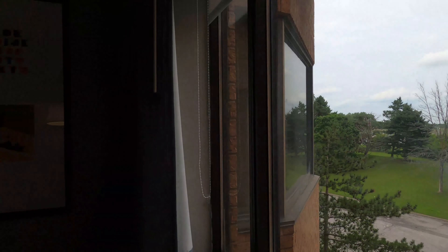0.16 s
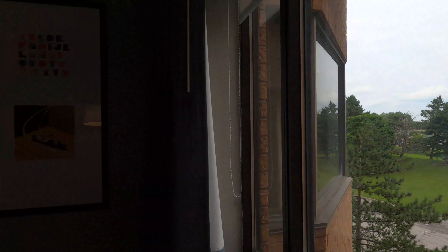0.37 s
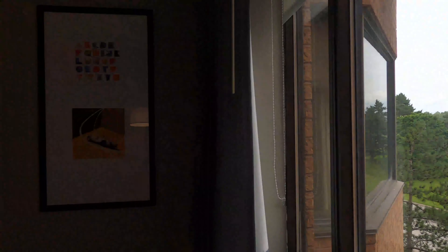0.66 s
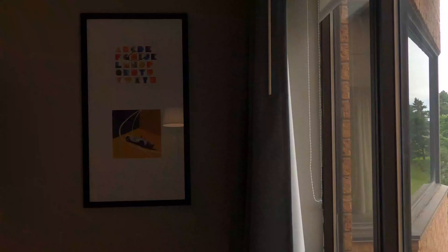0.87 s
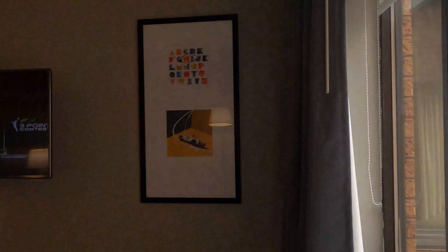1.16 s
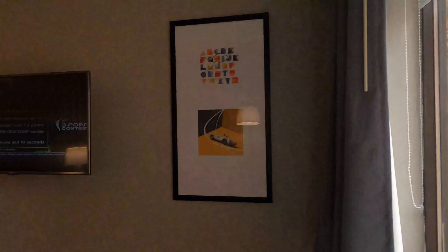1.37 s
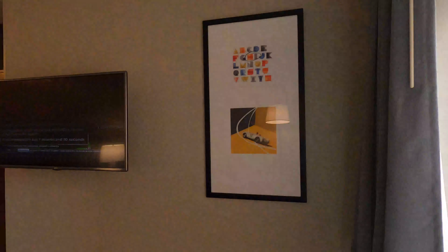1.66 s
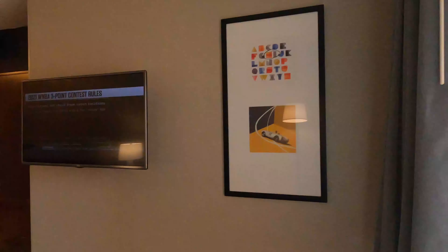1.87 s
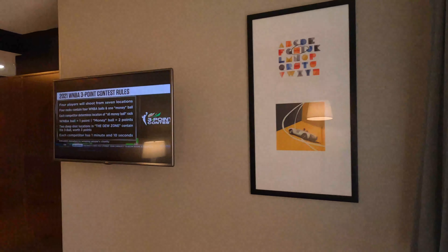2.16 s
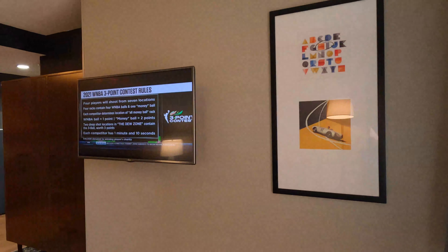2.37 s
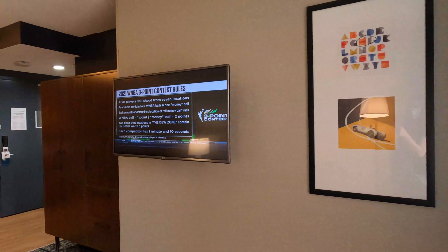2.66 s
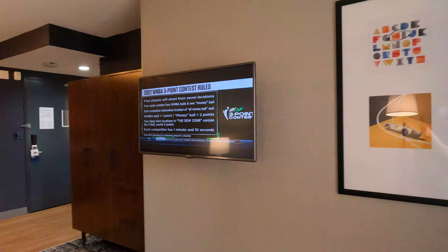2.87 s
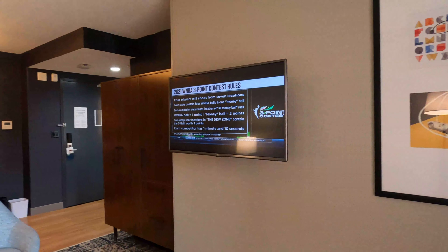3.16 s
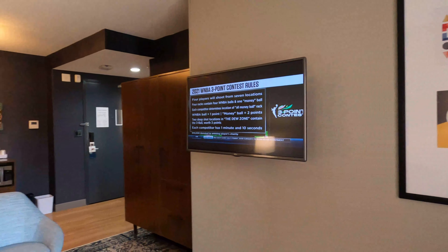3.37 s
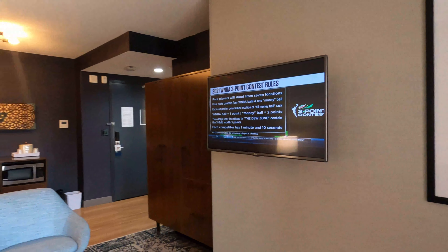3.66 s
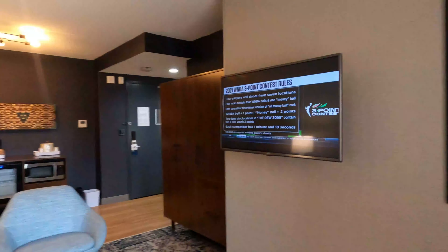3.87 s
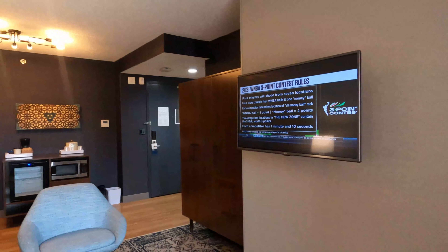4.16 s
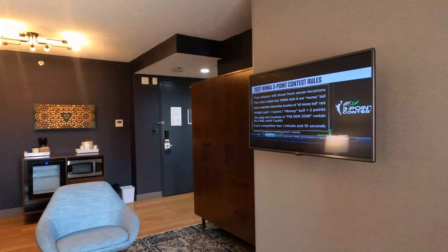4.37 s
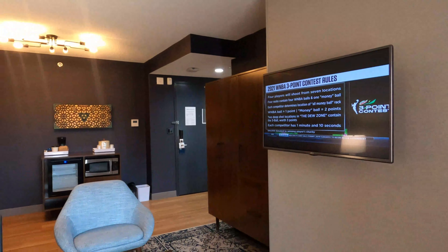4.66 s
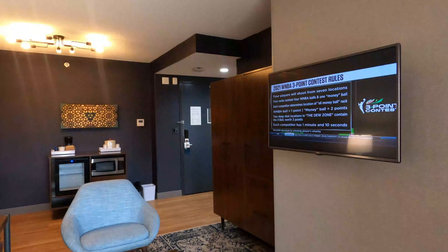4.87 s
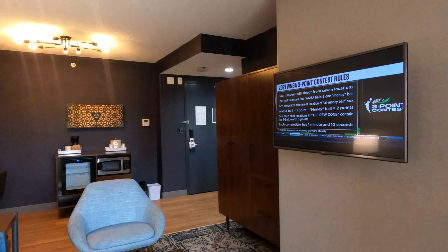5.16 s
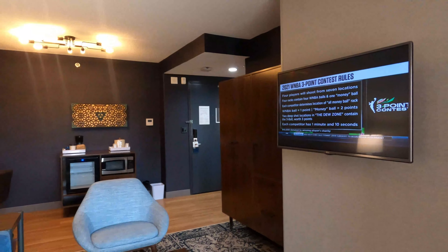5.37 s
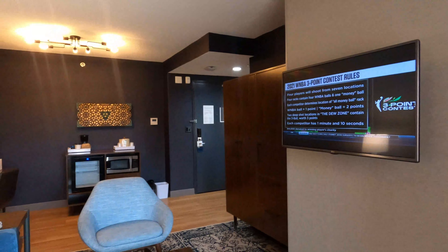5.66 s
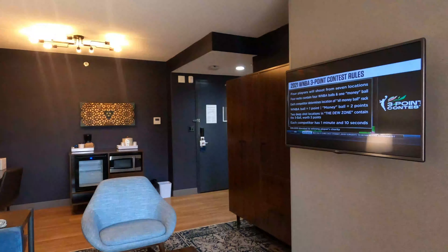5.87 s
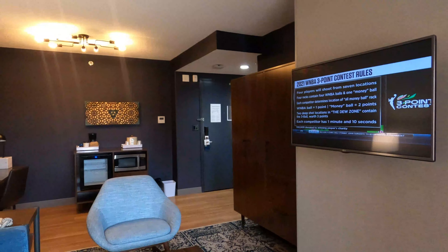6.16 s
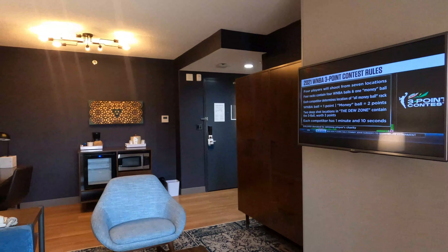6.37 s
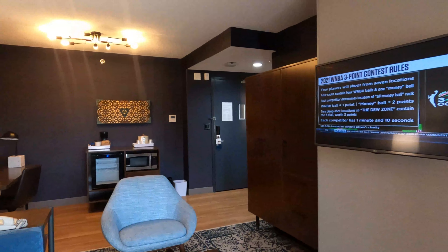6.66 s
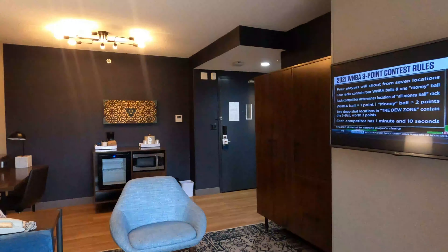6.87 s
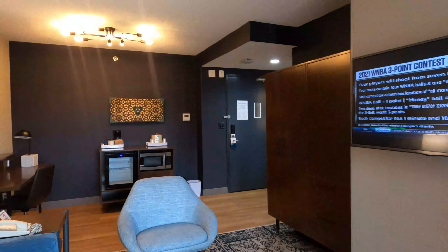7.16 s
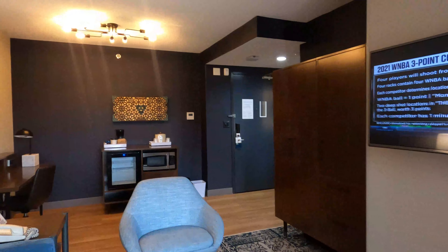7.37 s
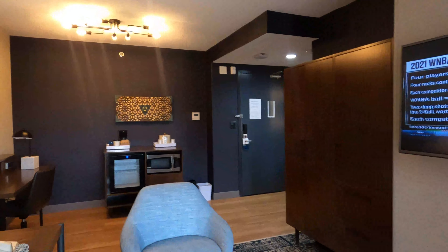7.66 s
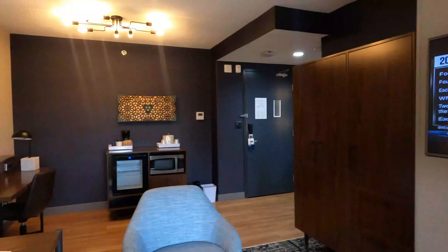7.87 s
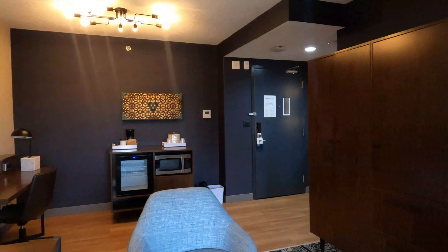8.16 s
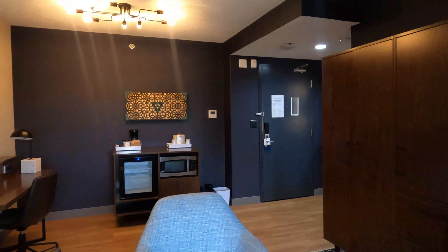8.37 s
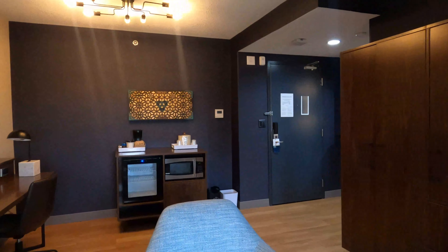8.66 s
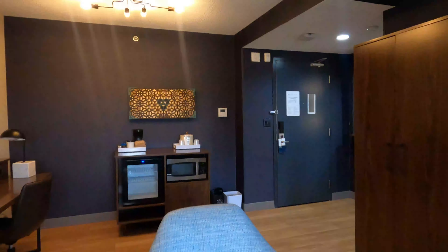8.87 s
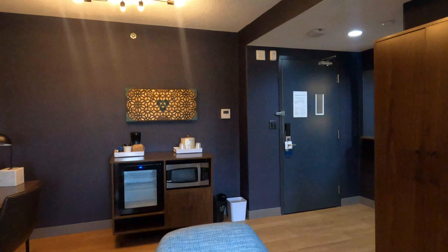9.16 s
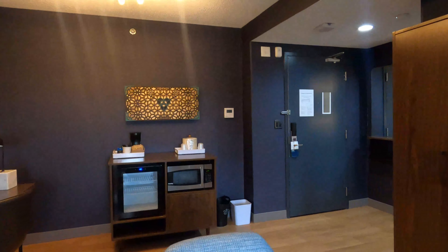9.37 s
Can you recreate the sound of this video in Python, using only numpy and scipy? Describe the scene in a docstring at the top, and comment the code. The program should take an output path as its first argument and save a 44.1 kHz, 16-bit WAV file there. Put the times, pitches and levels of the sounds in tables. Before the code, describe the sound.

Close indoor air-conditioning hum, bass-heavy and steady, with blower air and thin singing tones that waver as the handheld microphone travels across a room. Soft thuds of handling, mostly toward the left, and light fabric swishes interrupt it. Further away the duct noise dulls and the deep drone nearly vanishes for a moment, leaving a slight octave-higher hum. Right at the end, one crisp footstep clicks on the left and scuffs briefly.

```python
"""An air conditioner hums in a room: its compressor drone is a sum of steady sine waves, weak at one spot.
Partials tied to the mains beat against it. Its blower is shaped noise for the rushing air, plus singing tones.
Someone carries a phone slowly across the room: low noise bursts jostle it and filtered noise rustles as cloth.
Near the end a heel comes down as a crack and short rings, grit ticks, and the sole scuffs as fading noise."""
import sys
import numpy as np
from scipy import signal
from scipy.fft import rfft, irfft
from scipy.io import wavfile

SR = 44100
rng = np.random.default_rng(int(sys.argv[2]) if len(sys.argv) > 2 else 0)


def wav_record(signal):
    """Record a signal, one row per channel, as 16-bit PCM in the file named by sys.argv[1]."""
    frames = np.transpose(np.atleast_2d(signal))
    bounded = np.clip(frames, -1, 1)
    # unit amplitude maps onto the largest positive 16-bit level
    quanta = np.round(bounded * 32767).astype(np.int16)
    wavfile.write(sys.argv[1], SR, quanta)


N = 418943
TIME = np.arange(N) / SR  # seconds
FREQS = np.maximum(np.arange(N // 2 + 1) * SR / N, 1)  # Hz, kept above 0 for the logarithms

# how different the two microphone ports hear the room: (frequency [Hz], side minus mid [dB])
WIDTH = [(60, -8.5), (250, -17), (500, -18), (760, -11.5), (1150, -10), (1760, -7.5), (2700, -4.5),
         (4500, -1.5), (8000, 0.5)]
TAP_S = 8.9647  # the heel comes down


def undb(db):
    """Turn decibels into gain."""
    return 10 ** (np.asarray(db) / 20)


def colour(points):
    """Draw a gain curve over all frequencies through (Hz, dB) points."""
    hz, db = np.transpose(points)
    return undb(np.interp(np.log(FREQS), np.log(hz), db))


def bell(hz, octaves):
    """Give the gain at every frequency of one smooth band."""
    return np.exp(-(np.log2(FREQS / hz) / octaves) ** 2 / 2)


def unit(x):
    """Scale to an rms of 1."""
    return x / np.sqrt(np.mean(x ** 2))


def wander(rate_hz):
    """Make a slow, smooth random curve with an rms of 1; a higher rate moves faster."""
    lowpass = np.exp(-(np.arange(N // 2 + 1) * SR / N / rate_hz) ** 2)
    return unit(irfft(rfft(rng.standard_normal(N)) * lowpass, N))


def swell(s, length):
    """Rise and fall smoothly, reaching 1 at time s."""
    return np.exp(-2 * ((TIME - s) / length) ** 2)


def passed(s, span):
    """Step smoothly from 0 to 1 around time s."""
    return (1 + np.tanh((TIME - s) / span)) / 2


def strike(s, decay):
    """Make a soft contact at time s that dies away."""
    age = np.maximum(TIME - s, 0)
    contact = np.tanh((age / 0.0005) ** 2)  # rubber takes a moment to compress
    return contact * np.exp(-age / decay)


def ports(lean_db):
    """Give left and right gains for a sound that is so many dB stronger on the left."""
    return undb(lean_db * np.array([[.5], [-.5]]))


def diffuse(gain):
    """Make noise from all round the room: alike at both ports in the bass, far less alike in the treble."""
    # balance of the two ports: (frequency [Hz], left minus right [dB])
    lean_curve = [(300, 0.5), (1150, 1), (1800, 2), (2700, 4.5), (4500, 0.8), (8000, -1)]
    mid, side = rfft(rng.standard_normal((2, N))) * gain
    side = side * colour(WIDTH)
    lean = np.sqrt(colour(lean_curve))
    pair = irfft(np.array([(mid + side) * lean, (mid - side) / lean]), N)
    return pair / np.std(pair.mean(axis=0))


def tone(hz, waver_db, drift):
    """Make a tone whose level and phase wander as the phone moves through the reflections."""
    phase = 2 * np.pi * (hz * TIME + rng.random()) + drift * wander(1.6)
    spread = np.interp(hz, FREQS, colour(WIDTH)) * wander(1.0)
    level = undb(waver_db * (wander(3.4) - 0.95))
    return np.sqrt(2) * level * np.sin(phase + np.array([spread, -spread]))


def beside_unit():
    """Fall from 1 to 0 as the phone leaves the unit's side."""
    return 1 - passed(1.9, 0.75)


def in_shade():
    """Rise from 0 to 1 as the phone passes out of the direct sound of the duct."""
    return passed(7.32, 0.31)


def duct_level():
    """Give the duct roar's level in dB: a steady fall along the walk and a step down into the shade."""
    return -52.5 - 0.1351 * TIME - 8.5 * in_shade()


def duct_fade():
    """Give the duct level in dB around its own average, so other sounds can fade along with it."""
    level_db = duct_level()
    return level_db - level_db.mean()


def grip():
    """The hand trembles on the case: low noise flutters unevenly while the person walks."""
    return diffuse(bell(55, .7)) * undb(-49 + 3.9 * wander(7.5)) * swell(4.76, 1.6)


def jolts():
    """Each jolt of the phone is a short low noise burst that reaches the two ports separately."""
    # jolts of the hand-held phone:
    # (time [s], level [dB], length [s], upper edge [Hz], left minus right [dB])
    jolt_list = [(2.78, -41, 0.14, 85.5, 0), (3.225, -35, 0.083, 90, -6), (3.315, -34, 0.042, 68.5, -5),
                 (3.495, -32, 0.025, 81, -1), (4.374, -36.5, 0.085, 54, 2), (4.446, -36, 0.043, 70.4, 4),
                 (4.514, -25, 0.033, 90, 10.5), (4.653, -32, 0.13, 87, -2.5),
                 (5.248, -29.5, 0.078, 84.6, 3.5), (5.35, -35.5, 0.1, 99, 5), (6.238, -29, 0.047, 66, 5),
                 (6.316, -29.5, 0.026, 90, 6), (7.34, -31, 0.044, 92, 7), (7.517, -27.5, 0.048, 71, 5)]
    out = np.zeros((2, N))
    for s, db, length, edge_hz, lean_db in jolt_list:
        band = signal.butter(4, [18, edge_hz], "band", fs=SR, output="sos")
        buffet = signal.sosfilt(band, rng.standard_normal((2, N)))
        shape = swell(s, length)
        burst = buffet * shape
        even_out = np.sqrt(np.sum(shape ** 2) / np.sum(burst ** 2) * 2)  # same strength whatever the band
        out += undb(db) * ports(lean_db) * burst * even_out
    return out


def finger_knock():
    """A finger knocks the phone nearer the left port, pushing the case in and out once."""
    push = (TIME - 6.309) / 0.0016
    return undb(-22.5) * ports(13) * push * np.exp(-push ** 2 / 2)


def clothes():
    """Cloth rubs faintly all the time and swishes with movement, each fold favouring one band of the noise."""
    # spectrum of rubbing cloth: (frequency [Hz], relative level [dB])
    cloth_spectrum = [(500, -8), (1500, 2), (3500, -0.5), (5000, -5), (7500, -13.5), (10000, -22),
                      (13000, -42.5)]
    # swishes of clothing: (time [s], level before the mix of cloth and fold [dB], length [s], brightest at [Hz])
    swish_list = [(0.624, -72, 0.086, 3800), (.85, -72.5, 0.11, 3500), (1.251, -73.5, 1, 3500),
                  (2.85, -79, 0.25, 4000), (3.198, -71, 0.079, 3600), (3.423, -73, 0.072, 5500),
                  (3.878, -81, 0.088, 6500), (5.574, -75, 0.07, 5040), (5.824, -70, 0.11, 4660),
                  (6.906, -73, 0.36, 2800), (7.68, -69.5, 0.44, 5300), (8.42, -69, 0.33, 3300),
                  (8.854, -74.5, 0.32, 2500), (9.21, -65.5, 0.33, 2400)]
    cloth = diffuse(colour(cloth_spectrum))
    rustle = undb(-79.5) * cloth  # faint brushing between the swishes
    for s, db, length, hz in swish_list:
        fold = signal.lfilter(*signal.iirpeak(hz, 4.8, fs=SR), cloth)
        rustle = rustle + undb(db) * swell(s, length) * (0.78 * cloth + undb(-7.5) * fold)
    ring = signal.lfilter(*signal.iirpeak(4930, 90, fs=SR), cloth)
    rustle = rustle + undb(-64) * swell(5.7, .25) * ring  # mid-walk the rustle takes on a thin ring
    return rustle * undb(0.94 * wander(60))


def scuff():
    """After the heel lands the sole slides on: finely grained noise that holds briefly, then dies away."""
    # spectrum of the sliding sole: (frequency [Hz], relative level [dB])
    sole_spectrum = [(300, -4), (900, 1), (2200, 4), (4000, -3), (6500, -9), (8000, -17), (10000, -29),
                     (14000, -42)]
    attack_s, hold_s, fall_db_per_s = 0.0023, 0.023, -125
    age = np.maximum(TIME - TAP_S, 0)
    level_db = -50.5 + fall_db_per_s * np.maximum(age - hold_s, 0)
    sliding = np.tanh(age / attack_s) * undb(level_db)
    grain = undb(1.6 * wander(250))
    return diffuse(colour(sole_spectrum)) * sliding * grain


def footfall():
    """The heel strikes the floor on the left with a hard crack and a short ring; grit ticks under the sole."""
    # ringing of the heel on the floor: (frequency [Hz], level [dB], decay [s])
    heel_rings = [(640, -44, .003), (1080, -39, .0016), (2130, -36, 0.0013), (5600, -49, .001)]
    # grit catching under the sole: (time [s], level [dB])
    grit_ticks = [(8.9666, -42), (8.9814, -52), (9.005, -47)]
    push = (TIME - TAP_S - 0.00057) / 0.00019  # the force peaks just after the heel touches
    crack = undb(-34) * (1 - push ** 2) * np.exp(-push ** 2 / 2)
    knock = sum(undb(db) * np.sin(2 * np.pi * hz * (TIME - TAP_S)) * strike(TAP_S, decay)
                for hz, db, decay in heel_rings)
    catches = sum(undb(db) * strike(s, 0.00095) for s, db in grit_ticks)
    return (crack + knock) * ports(9) + diffuse(bell(4800, 0.42)) * catches


def motor_drive():
    """The motor drive whines thinly in a narrow hiss, high above the air, strongest early in the walk."""
    drive_hz, skirt_width_hz = 8543, 80
    line = undb(-100.5) * tone(drive_hz, waver_db=2.5, drift=1.2)
    skirt = undb(-103) * diffuse(1 / (1 + ((FREQS - drive_hz) / skirt_width_hz) ** 2))
    return (line + skirt) * undb(4 * swell(3.2, 1.5))


def blower_air():
    """Air rumbles in the casing, roars in the duct and rushes through the grille: noise, each with its colour."""
    # spectra of the air, the last as it reaches the far side of the room:
    # (frequency [Hz], relative level [dB])
    casing_spectrum = [(15, -2.5), (30, 0.5), (50, -3.5), (84, -2.5), (100, -4.5), (125, -0.5),
                       (160, -12.5), (215, -9), (245, -5.5), (268, -6.5), (295, -8.5), (340, -17),
                       (390, -14), (800, -58), (4000, -94.5)]
    duct_spectrum = [(200, -31), (340, -12), (365, -5), (395, 0), (440, 2), (470, 7), (520, -2.5),
                     (570, -4.5), (650, -1.5), (740, -14), (820, -6.5), (920, -17.5), (2000, -53),
                     (8000, -79.5)]
    grille_spectrum = [(300, -5), (700, -2), (900, -3.5), (1020, 0), (1300, 0), (1550, -5.5), (1850, -8.5),
                       (2100, -12.5), (2700, -16), (3500, -22.5), (5000, -29.5), (7000, -39.5), (8500, -42),
                       (10500, -61.5), (13000, -73.5)]
    far_spectrum = [(150, -15.5), (205, -3), (245, -5.5), (270, -11), (305, -1), (335, -10), (372, -1),
                    (430, -12), (520, -25), (590, -8.5), (680, -26), (805, -10), (880, -33), (3000, -63)]
    shade = in_shade()
    wall_db = 1.5 * swell(2.65, 0.74)  # the wall mirrors the grille rush as the phone passes it
    grille_db = -54.5 - 0.1449 * TIME - 0.4 * shade + wall_db
    casing = diffuse(colour(casing_spectrum)) * undb(-45.5 + 0.36 * duct_fade() + 1.8 * wander(6.7))
    duct = diffuse(colour(duct_spectrum)) * undb(duct_level() + .5 * wander(4.4))
    grille = diffuse(colour(grille_spectrum)) * undb(grille_db + 0.75 * wander(13))
    far = diffuse(colour(far_spectrum)) * undb(-54.5) * shade
    # a hollow rush heard only beside the outlet
    outlet = diffuse(bell(690, .22)) * undb(-60.5) * (1 - passed(2.6, 0.31))
    return casing + duct + outlet + far + grille


def blower_tones():
    """Motor, fans and panels sing along as wavering tones that change level with the phone's place."""
    # motor whine: (multiple of the blower tone, level before wavering [dB],
    #               change beside the unit [dB], change in the shade [dB])
    whine_tones = [(2, -63, 4, -9), (4, -71.5, 0.5, 3), (5, -64.5, -9.5, -3.5), (6, -72.5, 0.5, -2.5)]
    # singing of the fans and casing: (frequency [Hz], level before wavering and fading [dB], unsteadiness [dB])
    singing_tones = [(127.9, -60.5, 0.5), (359.4, -65.5, 2.5), (364.3, -60.5, 3), (474, -66.5, 0.5)]
    blower_hz = 232.3
    shade, beside = in_shade(), beside_unit()

    # the front panel is quieter beside the unit and in the shade; the phone crosses its axis at 3.4 s
    panel_db = -55.5 - 3.5 * beside + 4.5 * swell(3.4, 0.83) - 11.5 * shade
    panel = undb(panel_db) * tone(502.6, waver_db=0.8, drift=0.12)

    whine = sum(undb(db + near_db * beside + shaded_db * shade)
                * tone(multiple * blower_hz, waver_db=3.5, drift=0.83)
                for multiple, db, near_db, shaded_db in whine_tones)
    singing = sum(undb(db) * tone(hz, waver_db=waver, drift=0.59) for hz, db, waver in singing_tones)
    singing = singing * undb(.8 * duct_fade() - 3 * shade)

    # the fan tone stands in the room and has a node, a quiet spot, of its own
    fan = undb(-54) * tone(272.4, waver_db=2, drift=.4) * np.tanh((TIME - 8.05) / 0.96)

    # two thin motor whistles; the lower comes through as the phone turns from the window
    low_whistle = undb(-76.5) * passed(.35, .6) * tone(2653, waver_db=2.0, drift=0.46)
    high_whistle = undb(-81) * tone(2830, waver_db=2.0, drift=0.46)
    return panel + whine + singing + fan + low_whistle + high_whistle


def compressor():
    """The shaft slips just behind the mains, so their partials beat; the drone stands as a wave in the room."""
    # partials: (multiple of the shaft rate, multiple of the mains rate, level [dB])
    partial_list = [(.5, 0, -54.5), (2, 0, -57), (3, 0, -64), (1, 2, -60.5), (-1, 4, -62.5), (2, 2, -63.5),
                    (0, 4, -57.5)]
    shaft_hz, mains_hz = 58.07, 60.01
    shaft = 2 * np.pi * (shaft_hz * TIME + rng.random()) + 0.066 * wander(0.99)
    mains = 2 * np.pi * (mains_hz * TIME + rng.random())

    # the phone crosses a node of the drone at 8.31 s; -15.5 dB is what remains there
    standing = np.hypot(np.tanh((TIME - 8.31) / 1.19), undb(-15.5))
    drone = undb(-30 + 2 * beside_unit()) * standing * np.sin(shaft)

    # the mains hum, an octave up, swells around that node and wavers a little
    hum_db = -53.5 + 7.5 * passed(7.0, 0.27) + 1.3 * wander(2.9)
    hum = undb(hum_db) * (1 - passed(9.1, 0.27)) * np.sin(2 * mains + 0.44 * wander(3.8))

    partials = 0
    for shaft_multiple, mains_multiple, db in partial_list:
        phase = shaft_multiple * shaft + mains_multiple * mains + 2 * np.pi * rng.random()
        partials = partials + undb(db + 0.39 * wander(0.93)) * np.sin(phase)

    # the third harmonic has a crest at the far side; the fourth builds up deeper in the room
    crest = undb(-55) * swell(9.3, 0.4) * np.sin(3 * shaft)
    room_tone = undb(-56 + 1.5 * wander(1.5)) * passed(5.5, 2.5) * np.sin(4 * shaft)
    return np.sqrt(2) * (drone + hum + partials + crest + room_tone)  # sine levels are rms


def scene():
    """Add up the person walking with the phone and the unit they walk away from."""
    person = grip() + jolts() + finger_knock() + clothes() + scuff() + footfall()
    air_conditioner = motor_drive() + blower_air() + blower_tones() + compressor()
    return person + air_conditioner


def record(dry):
    """The phone cuts the top, above 14500 Hz, with a steep low-pass filter."""
    return signal.sosfilt(signal.ellip(8, .1, 70, 14500, fs=SR, output="sos"), dry)


dry = scene()
out = record(dry)
wav_record(out)
```